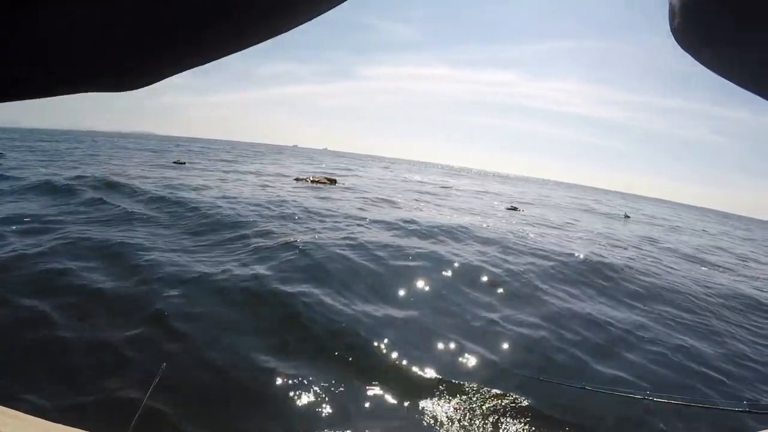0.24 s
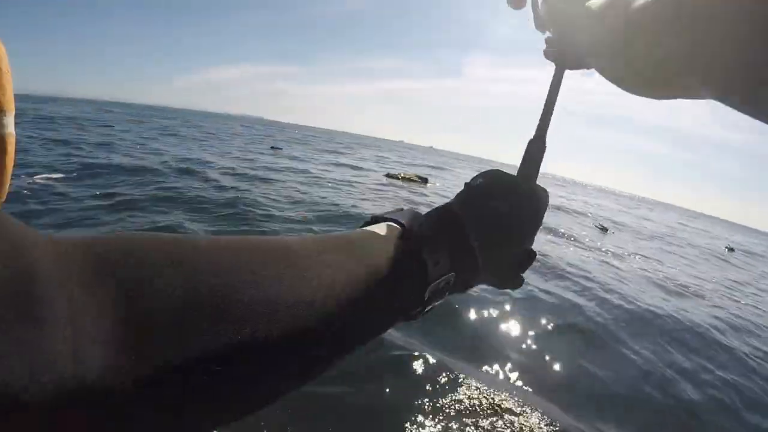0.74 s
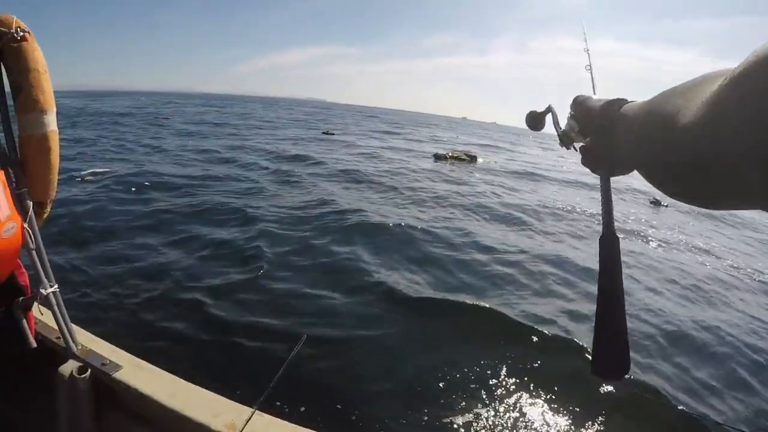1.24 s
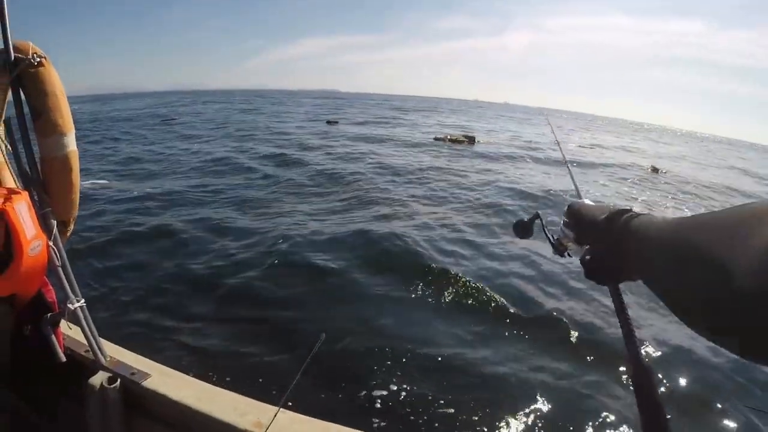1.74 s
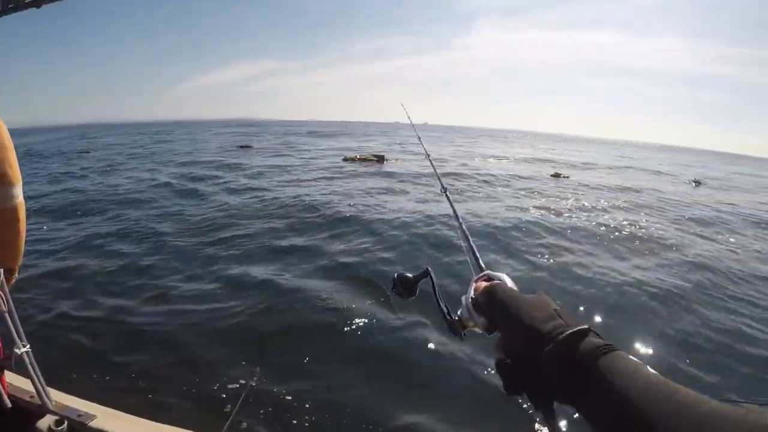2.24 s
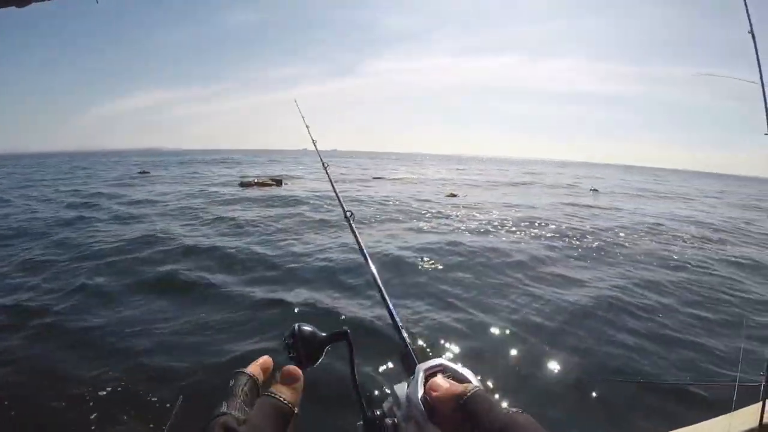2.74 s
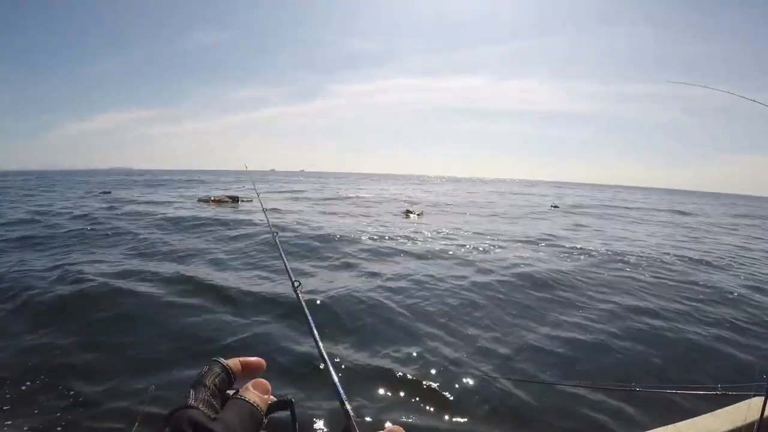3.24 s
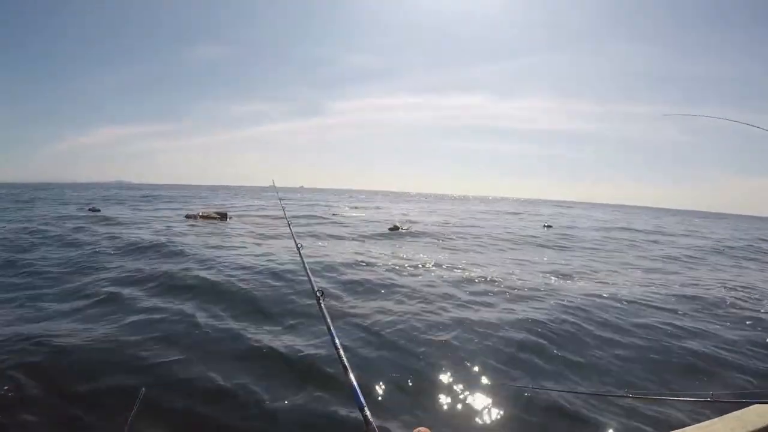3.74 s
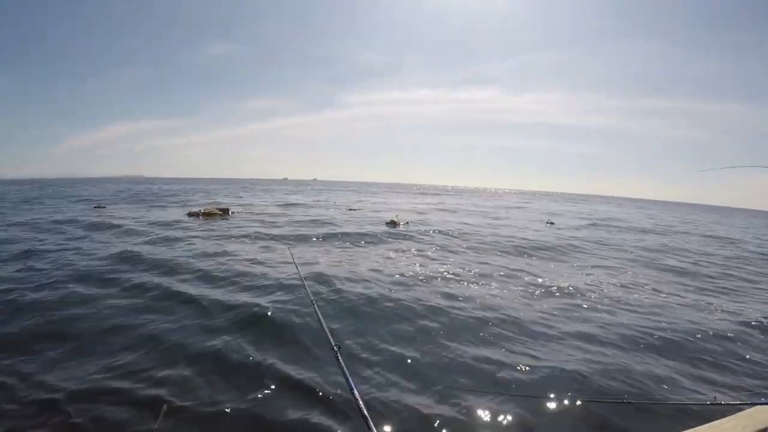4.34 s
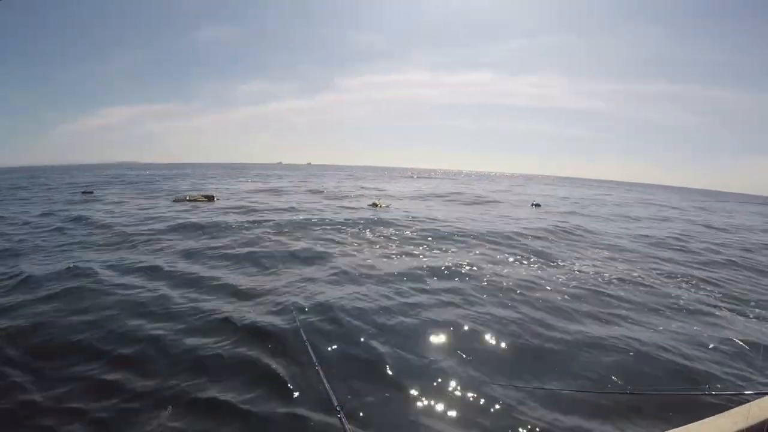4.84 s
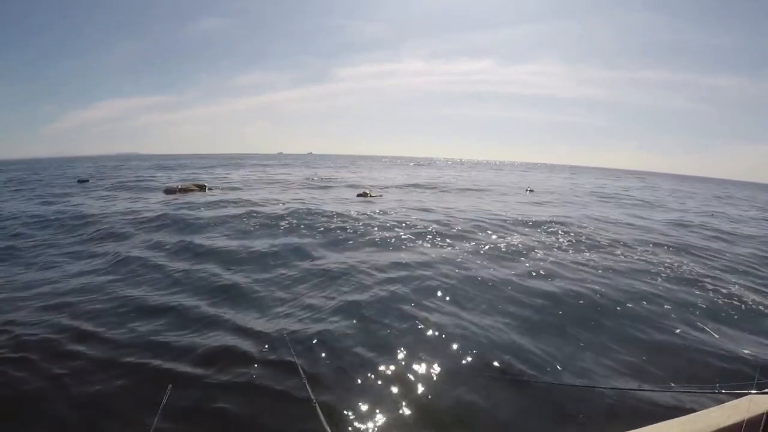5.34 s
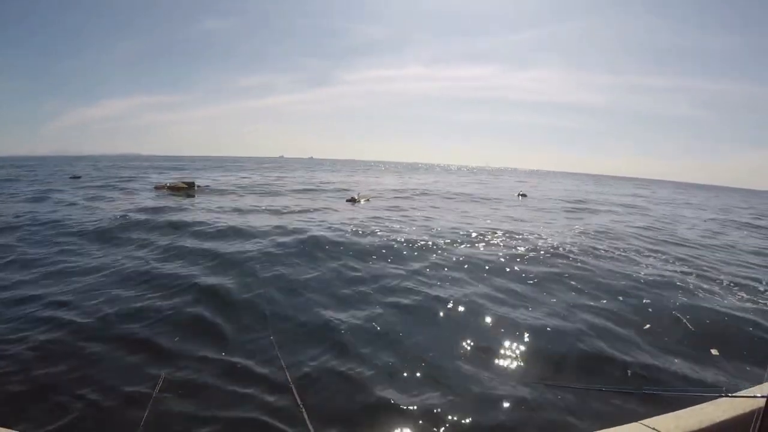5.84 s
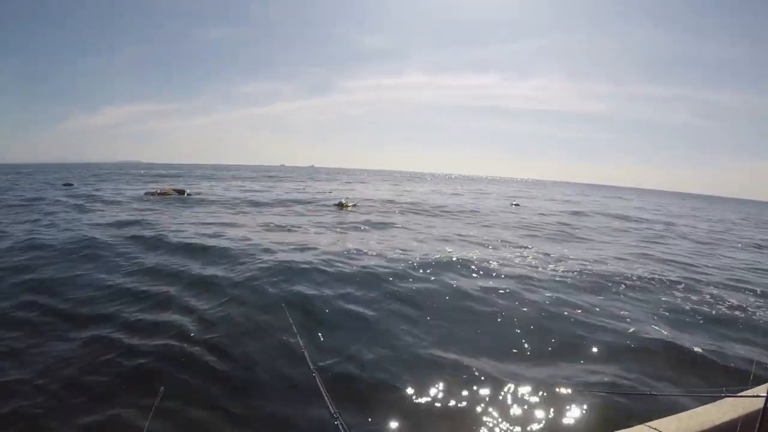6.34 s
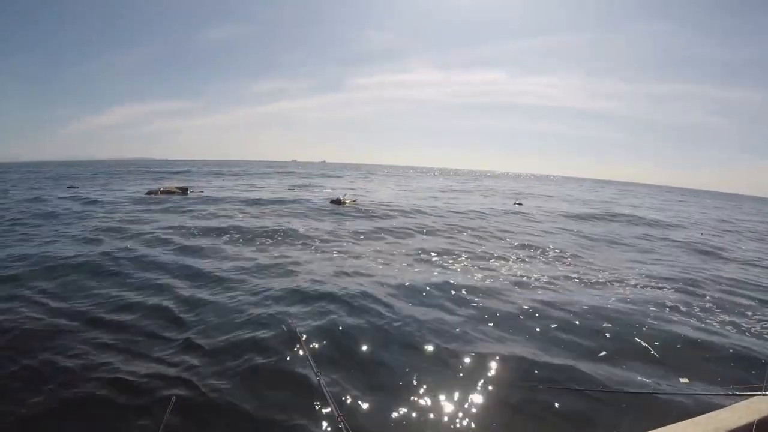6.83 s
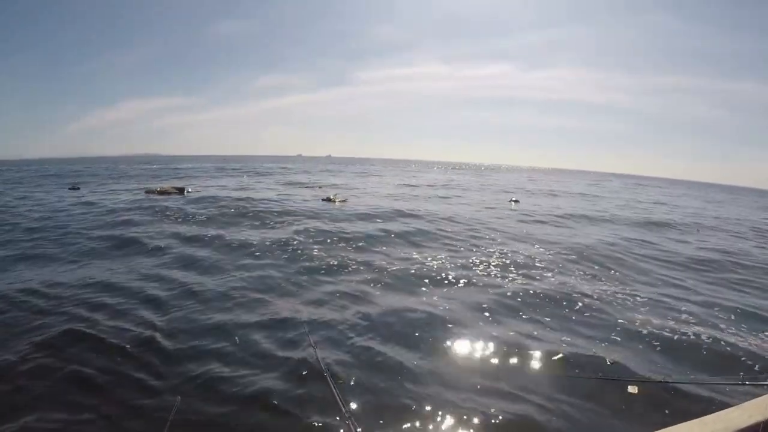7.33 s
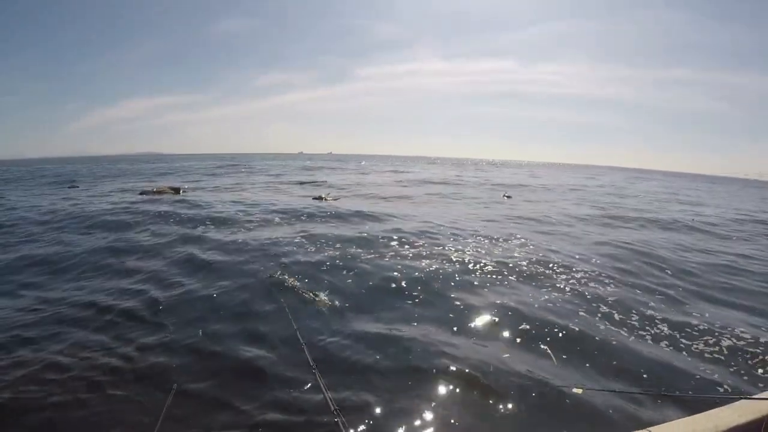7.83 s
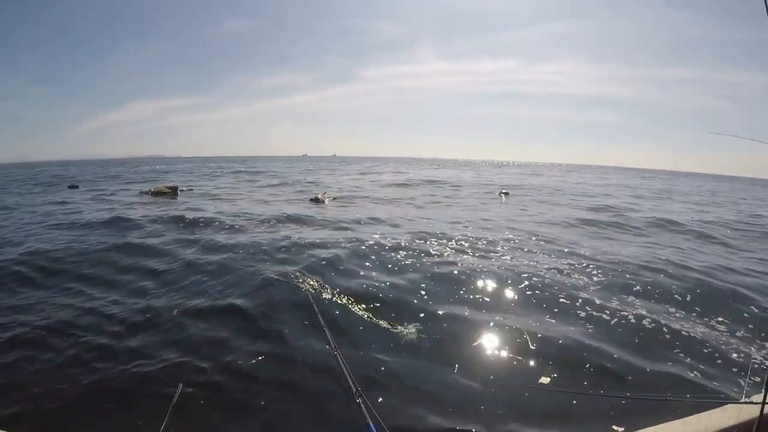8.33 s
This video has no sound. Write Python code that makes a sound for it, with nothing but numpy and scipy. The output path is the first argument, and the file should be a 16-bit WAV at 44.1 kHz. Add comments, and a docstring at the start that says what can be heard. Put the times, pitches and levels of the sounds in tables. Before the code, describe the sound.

Close lapping sea water and hissing foam, hard splashy slaps on a small hull, fishing gear knocking and snapping, then quieter ripples and bubbles.

```python
"""Low lapping and a hiss of foam come first, then hard thumps and slaps of water on the hull of a drifting boat.
Open sea, close at hand, at a small worn camera: filtered noise laps and fizzes, decaying tones thump and bubble.
Sleeves rub and gear knocks through the strap, both grains and blows; the reel snaps; wind noise rumbles low.
Two microphone ports give a sum (mid) and a difference (side) that depend on the path of each sound."""
import sys
import numpy as np
from scipy import signal
from scipy.fft import irfft
from scipy.io import wavfile
from scipy.ndimage import uniform_filter1d

SR = 44100
rng = np.random.default_rng(int(sys.argv[2]) if len(sys.argv) > 2 else 0)


def master(y):
    """Save y as 16-bit WAV."""
    cut = np.clip(np.atleast_2d(y).T, -1, 1)
    pcm = np.round(cut * 32767)  # scale
    wavfile.write(sys.argv[1], SR, pcm.astype(np.int16))


N = 378378


def gain_of(db):
    """Amplitude factor of a level in dB."""
    return 10 ** (np.asarray(db) / 20)


def evened(x):
    """The signal scaled to an RMS of one."""
    return x / np.sqrt(np.mean(x ** 2) + 1e-20)


def curve(table, column):
    """One column of a table as a gain for every sample."""
    rows = np.array(table)
    return gain_of(np.interp(np.arange(N) / SR, rows[:, 0], rows[:, column]))


def band(x, lo_hz, hi_hz):
    """The part of a signal between two frequencies, with gentle slopes."""
    sections = signal.butter(N=2, Wn=[lo_hz, hi_hz], btype="band", fs=SR, output="sos")
    return signal.sosfilt(sections, x)


def flicker(width_s, depth_db):
    """Random level changes that last about width_s."""
    size = max(int(width_s * SR), 1)
    smooth = uniform_filter1d(uniform_filter1d(rng.standard_normal(N), size), size)
    return gain_of(depth_db * evened(smooth))


def grains(spread_db, per_s):
    """Two trains of tiny impacts, a few large: the same moments, but unrelated signs and strengths."""
    hits = rng.random(N) < per_s / SR
    size = gain_of(spread_db * np.minimum(rng.exponential(1, N), 4)) * hits
    return evened(size * rng.standard_normal((2, N)))


def drips(spread_db, per_s):
    """Scattered 9 ms droplets that rise in pitch; per_s at each of ten pitches, alike in both rows."""
    out, u = np.zeros((2, N)), np.linspace(0, 1, 400)
    for hz in np.geomspace(500, 4200, num=10):
        hits = rng.random(N) < per_s / SR
        size = gain_of(spread_db * np.minimum(rng.exponential(1, N), 3)) * hits
        cycles = hz * len(u) / SR * (u + 0.11 * u ** 2)
        drop = np.sin(2 * np.pi * cycles) * np.sin(np.pi * np.sqrt(u))
        out += signal.oaconvolve(size, drop)[:N]
    return evened(out)


def humps(start, length, db, ease_s):
    """Envelope of sounds that ease in, hold and ease out; their powers add."""
    t = np.arange(0, N / SR, .002)
    power = np.zeros(len(t))
    for s, n, level_db in zip(start, length, db):
        ease = np.clip(np.minimum(t - s, s + n - t) / ease_s + .5, 0, 1)
        power += gain_of(2 * level_db) * ease ** 2
    return np.interp(np.arange(N) / SR, t, np.sqrt(power))


def decays(s, db, t60, rise_s):
    """Envelope of many events, each a quick rise and an exponential fall, 6.8 ms longer than t60."""
    out, t = np.zeros(N + SR), np.arange(SR // 3) / SR
    for start, level_db, fall in zip(s, db, np.abs(t60) + 0.0068):
        at = round(start * SR)
        out[at:at + len(t)] += gain_of(level_db - 60 * t / fall) * (1 - np.exp(-t / rise_s))
    return out[:N]


def ports(drive, colour, path, skirt_db=30, focus=0.93):
    """Colours drive[0] causally as the mid; the side mixes it with the unrelated drive[1].

    skirt_db is the fall per octave outside the colour table; focus scales the likeness."""
    octave = np.log2(np.abs(np.fft.fftfreq(4096, 1 / SR)) + 1)
    f, *levels = np.transpose(colour)
    outside = skirt_db * np.abs(octave - np.clip(octave, np.log2(f[0]), np.log2(f[-1])))
    mid, side = (gain_of(np.maximum(np.interp(octave, np.log2(f), db) - outside, -100)) for db in levels)
    f, *relation = np.transpose(path)
    lead, like = (np.interp(octave, np.log2(f), column) for column in relation)
    like = np.clip(focus * like, 0, 1)
    # minimum phase of the mid, shared by all three filters
    turn = np.exp(-1j * signal.hilbert(np.log(mid)).imag)
    spectra = np.array([mid, side * like * np.exp(1j * lead), side * np.sqrt(1 - like ** 2)]) * turn
    # 256 samples of room let the side lead the mid
    taps = np.roll(irfft(spectra[:, :2049]), 256, axis=1)
    taps /= np.linalg.norm(taps[0])
    mid, alike, apart = signal.oaconvolve(drive[[0, 0, 1]], taps, axes=1)[:, 256:256 + N]
    return np.array([mid + alike + apart, mid - alike - apart])


# Slow state of the sea around the boat, before the colour of the ports.
# Each row: time in seconds, lapping in dB, wash in dB.
SEA_STATE = [(0, -45, -45.5), (.3, -48.5, -51.5), (.55, -37, -41.5), (.85, -44.5, -49.5),
             (1.6, -48.5, -47.5), (2.4, -48, -48), (2.65, -43.5, -48.5), (3.35, -42.5, -49.5),
             (3.6, -46.5, -47.5), (4.45, -48, -48), (4.7, -42, -46.5), (5.0, -50, -50.5),
             (5.4, -43.5, -47.5), (5.95, -48, -50.5), (6.28, -41, -48.5), (6.7, -50, -53), (7.5, -47, -51),
             (8.58, -48, -49)]
# Surges of spray along the hull, before filters and colour.
# Each row: start in seconds, length in seconds, wash in dB, fizz in dB.
SPRAY_SURGES = [(0.01, 0.18, -39, -43), (0.156, 0.14, -38, -36.5), (0.292, 0.32, -32, -41),
                (0.686, .13, -36, -55), (1.822, 0.37, -43.5, -46.5), (2.44, 0.13, -32, -43.5),
                (3.313, 0.21, -39.5, -45.5), (3.94, 0.51, -56, -41.5), (4.53, .08, -41, -52),
                (5.24, 0.05, -46, -41), (8.101, 0.099, -52, -41)]
# Colour of the sea at the microphone ports.
# Each row: frequency in Hz, relative mid level in dB, relative side level in dB.
SEA_COLOUR = [(112, -18.5, -25), (147.5, 5.5, 0.5), (268, -2, -4.5), (352, -1, -9.5), (588, -13, -8),
              (1010, -11, -2), (1806, -8, -6.5), (2250, -18, -16), (3300, -13.5, -19), (4420, -25, -26.5),
              (6960, -25.5, -25), (7300, -24, -24.5), (9630, -28, -28.5), (11500, -36, -36),
              (15400, -43, -43)]
# How the side follows the mid for sound through the air, before focus scales the likeness.
# Each row: frequency in Hz, lead of the side in radians, likeness from 0 to 1.
AIR_PATH = [(150, -3.1, .4), (400, -2.7, .7), (900, -2.9, .8), (1250, -3.5, .6), (1700, -4.7, .8),
            (2400, -7.9, .6), (3500, -9.3, .6), (4600, -9.4, .2), (7500, -9.5, .9), (14000, -9.5, .6)]


def sea():
    """Lumpy low lapping, a wash with droplets, spluttering surges and fizzing foam come by air."""
    surge_ease_s, fizz_over_wash_db = 0.11, 5.5
    noise = rng.standard_normal((3, 2, N))
    lapping = curve(SEA_STATE, column=1) * flicker(.03, 2.6) * band(noise[0], 99, 595)

    s, length, wash_db, fizz_db = np.transpose(SPRAY_SURGES)
    calm = curve(SEA_STATE, column=2)
    surge = humps(s, length, wash_db, surge_ease_s)
    puffs = flicker(.04, 1.6) * band(noise[1], 580, 4250)
    wash = np.hypot(calm, gain_of(-4.0) * surge) * puffs
    wash += 0.093 * calm * drips(8.8, 4)
    trickle = gain_of(-20) * drips(6.8, 40)
    splutter = gain_of(-4) * flicker(0.031, 7.1) * band(grains(2.6, 2500), 4150, 6800)
    wash += surge * (trickle + splutter)

    foam = noise[2] + 0.63 * grains(3.9, 2500)
    bursting = np.hypot(gain_of(fizz_over_wash_db) * calm, humps(s, length, fizz_db, surge_ease_s))
    fizz = bursting * flicker(0.021, 1.7) * band(foam, 4570, 12700)
    return ports(lapping + wash + fizz, SEA_COLOUR, AIR_PATH, skirt_db=41.0, focus=0.71)


# Low thumps of the hull under the camera.
# Each row: start in seconds, level before rise and filters in dB, settled pitch in Hz, left over right in dB.
HULL_THUMPS = [(0.226, -18.5, 189, 3), (0.365, 1.9, 203, -1.1), (0.492, -15, 200, 2),
               (0.592, -15.5, 230, 12), (0.622, -24, 200, 0), (0.656, -10, 306, 8), (0.836, -23, 250, 3),
               (1.657, -17.5, 313, 27), (1.692, -34, 270, 42), (1.861, -21, 170, 19), (2.767, -19, 250, 6),
               (2.851, -16.5, 204, 17), (3.082, -17, 159, -5), (3.478, -22.5, 340, 23),
               (3.694, -20, 171, -16), (3.728, -20.5, 220, 0), (4.736, -3, 166, -1), (4.781, -11, 178, 1),
               (5.406, -16, 330, -3), (5.526, -8.5, 201, -1.5), (5.615, -24, 175, -18),
               (5.707, -23, 266, 0), (5.863, -23, 160, 0), (6.119, -14.5, 151, 9), (6.185, -21, 199, -1.1),
               (6.278, -16.5, 150, 0), (6.463, -18.5, 330, 6), (7.283, -24, 175, 1), (7.8995, -11, 320, 17)]


def thumps():
    """The hull swings for a few cycles, its pitch sagging at the onset, and rumbles on."""
    swing_t60_s, rumble_db, rumble_t60_s = 0.023, -18.5, 0.23
    out, t = np.zeros((2, N + SR)), np.arange(SR // 8) / SR
    for s, db, hz, pan_db in HULL_THUMPS:
        swing = np.sin(2 * np.pi * hz * (t + 0.00078 * (1 - np.exp(-t / 0.0014))))
        shape = gain_of(db - 60 * t / swing_t60_s) * (1 - np.exp(-t / 0.0015)) ** 2
        pan = gain_of([[pan_db / 2], [-pan_db / 2]])
        out[:, round(s * SR):][:, :len(t)] += pan * shape * swing
    s, db, _, _ = np.transpose(HULL_THUMPS)
    rumble = evened(band(rng.standard_normal(N), 135.3, 187))
    tail = decays(s, db + rumble_db, rumble_t60_s + 0 * s, 0.0014) * rumble
    # the thumps have little below about 120 Hz
    return band(band(out[:, :N] + tail, 122, 2000), 120, 2200)


# Slaps of water close to the camera; brightness trades body for sizzle.
# Each row: start in seconds, level before filters in dB, brightness in dB, ring in Hz, nominal t60 in seconds.
WATER_SLAPS = [(0.06, -30.5, -0.5, 3250, 0.2), (0.215, -34, 3, 3640, 0.12), (0.365, -7.5, -5, 1350, 0.036),
               (0.6998, -32, 1.5, 1540, 0.065), (1.512, -35, -1, 2000, 0.04), (2.01, -29, -5, 2880, 0.05),
               (2.113, -38.5, 6, 3920, 0.046), (2.157, -34, -2, 3400, 0.079),
               (2.3509, -11, -0.5, 1790, 0.13), (2.593, -21, 0.5, 1560, 0.16), (2.626, -34, -6, 1510, 0.12),
               (2.645, -28.5, 0, 1650, 0.077), (3.0782, -32, 9, 1640, 0.078), (3.871, -27.5, 0, 3060, 0.11),
               (3.877, -23, -3, 1250, 0.043), (3.884, -27, -5.5, 990, 0.056),
               (4.7346, -10.5, -11, 1490, 0.092), (4.7836, -14, -11, 1510, 0.085),
               (5.046, -44, 17, 1670, 0.11), (5.292, -27, -3, 1650, 0.08), (5.3787, -30.5, 5, 1630, 0.12),
               (5.401, -21, -1.5, 3360, 0.1), (5.4584, -39, 8.5, 1720, 0.085), (5.525, -8, -2, 1740, 0.084),
               (5.554, -17.5, 2, 1580, 0.13), (5.706, -20, -0.8, 3700, 0.083),
               (5.7867, -37, 0, 1200, 0.041), (5.862, -35, -7, 1670, 0.075), (5.876, -33, 0, 3300, 0.083),
               (5.896, -26, -3.5, 2970, 0.14), (6.072, -40, 3, 3540, 0.095), (6.099, -31, -5, 3500, 0.076),
               (6.116, -33, -10, 2200, 0.05), (6.173, -14, -1, 2400, 0.077), (6.2696, -37, 3.5, 1760, 0.15),
               (6.366, -47.5, 15, 3500, 0.1), (6.4389, -28.5, -7, 3570, 0.088),
               (7.0355, -39.5, 0, 3660, 0.084), (7.148, -36.5, -6, 3550, 0.06), (7.9, -31, -7, 1500, 0.04),
               (7.929, -44, -5, 1800, 0.053), (8.516, -38, -5, 1520, 0.1), (8.527, -36, -4, 1990, 0.055)]
# Colour of a splash at the microphone ports.
# Each row: frequency in Hz, relative mid level in dB, relative side level in dB.
SPLASH_COLOUR = [(149, 17, -18), (265, -0.5, -20), (402, 8.5, -7), (640, -7, -1.5), (1060, -0.5, 3),
                 (1280, -3, 2), (1650, -5, -6), (2260, -14.5, -10), (2800, -13, -15.5), (3480, -12, -22),
                 (3990, -17.5, -25), (6800, -25, -23), (7750, -24.5, -24), (9570, -31, -31),
                 (14000, -49, -45)]


def slaps():
    """A crack, then a burst of droplets; air pockets ring, purer in quiet slaps, and the body lingers."""
    body_db, sizzle_db = -8, 6.5  # against the slap, at zero brightness
    s, db, bright_db, ring_hz, t60 = np.transpose(WATER_SLAPS)
    spray = grains(0.1, 6000)
    crack = decays(s, db - 19.0, 0.084 * t60, 0.00049)
    smack = (decays(s, db, t60, 0.00031) + crack) * spray
    body = decays(s, db + body_db - bright_db, 1.23 * t60, .0022) * band(spray, 476, 2400)
    sizzle = decays(s, db + sizzle_db + bright_db, 0.83 * t60, 0.00063) * band(spray, 3220, 10400)
    rung, starts = np.zeros((2, N)), np.round(s * SR).astype(int)
    # each ring lasts at most until the next slap
    for at, end, hz, level_db in zip(starts, [*starts[1:], N], ring_hz, db):
        purity = gain_of(-2.5 - .22 * level_db)
        rung[:, at:end] = purity * band(smack[:, at:end], hz / 1.01, hz * 1.12)
    return ports(body + band(smack, 1660, 4760) + rung + sizzle, SPLASH_COLOUR, AIR_PATH, focus=0.84)


# Dull knocks of gear, reaching the housing through its strap.
# Each row: time in seconds (the blow falls 3 ms later), level before filters in dB.
GEAR_KNOCKS = [(0.593, -9), (0.621, -5.5), (0.657, 0.5), (0.836, -14.5), (1.658, -10.5), (1.692, -17),
               (1.863, -16.5), (2.754, -9.5), (2.764, -11.5), (2.812, -12.5), (2.85, -16), (2.93, -4.5),
               (3.025, -5), (3.078, -2.5), (3.199, -2), (3.267, -9), (3.35, -7), (3.479, -16.5),
               (3.506, -7), (3.571, -13), (3.691, -3.5), (4.059, -14), (4.292, -15.5), (4.423, -16.5),
               (4.574, -16.5), (4.646, -6), (5.614, -15), (6.115, -13.5), (6.379, -9.5), (6.467, -17.5),
               (7.8979, -8)]
# Colour of the strap at the microphone ports.
# Each row: frequency in Hz, relative mid level in dB, relative side level in dB.
STRAP_COLOUR = [(221, 4.5, 2.5), (394, 3, 13), (463, 11, 17.5), (570, 2.5, 10.5), (880, -9.5, 13),
                (1020, 6.5, 15), (1172, 6.5, 15), (1450, -14, 1), (1510, -5, 8), (2100, -14, -5.5),
                (2300, -1, 8), (2690, -12, -8), (3200, -21, -50), (3940, -20, -47)]
# How the side follows the mid for sound through the strap, before focus scales the likeness.
# Each row: frequency in Hz, lead of the side in radians, likeness from 0 to 1.
STRAP_PATH = [(250, .6, .5), (470, 0, .9), (800, -.4, .8), (1000, -1.9, .7), (1170, -1.6, .8),
              (1400, -1, .5), (2400, -1.6, .8), (3400, -2.8, .5)]


def knocks():
    """A soft blow, a quick rebound and a brief scuff ring the housing; the blow pushes both ports alike."""
    s, db = np.transpose(GEAR_KNOCKS)
    blows = np.zeros(N)
    blows[np.round((s + .003) * SR).astype(int)] = gain_of(db)
    blows += 0.43 * np.roll(blows, round(0.00147 * SR))  # rebound
    scuff = decays(s + 0.0018, db - 19, 0.016 + 0 * s, 0.001) * rng.standard_normal((2, N))
    push = gain_of(5) * band(band(blows, 140, 1100), 140, 2600)
    ringing = band(band(blows + scuff, 172, 1450), 143, 6500)
    return push + ports(ringing, STRAP_COLOUR, STRAP_PATH, skirt_db=2.0, focus=1.35)


# Deep boom of the hull after a knock.
# Each row: start in seconds, level before the rise in dB, pitch in Hz, t60 in seconds.
HULL_BOOMS = [(0.672, -17, 21, 0.33)]


def booms():
    """A slow, deep swing of the hull that dies within a few cycles, the same at both ports."""
    out, t = np.zeros(N), np.arange(SR // 2) / SR
    for s, db, hz, t60 in HULL_BOOMS:
        shape = gain_of(db - 60 * t / t60) * (1 - np.exp(-t / 0.0086))
        out[round(s * SR):][:len(t)] += shape * np.sin(2 * np.pi * hz * t)
    return out


# Strokes of the angler's sleeves on the strap, before flicker and colour.
# Each row: start in seconds, length in seconds, level in dB.
SLEEVE_STROKES = [(0.172, 0.65, -42), (0.786, 1.33, -50), (1.936, 1.01, -48), (2.327, 0.1, -39),
                  (3.257, 0.22, -36), (3.5, 0.66, -58), (7.866, 0.19, -52)]


def sleeves():
    """Cloth dragging over the strap: dense grains in uneven strokes."""
    stroke_ease_s, resting_db = 0.21, -59.5
    pressure = np.hypot(gain_of(resting_db), humps(*np.transpose(SLEEVE_STROKES), stroke_ease_s))
    rub = pressure * flicker(0.024, 2.34) * grains(2.4, 4000)
    return ports(rub, STRAP_COLOUR, STRAP_PATH, skirt_db=19.0)


# Snaps and ticks of the reel, heard through the air.
# Each row: time in seconds (the click falls 0.6 ms later), click in dB and rasp in dB before the colour,
# nominal rasp t60 in seconds.
REEL_SNAPS = [(0.266, -17, -39, .004), (0.52, -30, -31, 0.046), (0.532, -16, -21.5, 0.05),
              (0.542, -20, -40, 0.0085), (1.9295, -13.5, -30.5, 0.0041), (0.538, -1, -12, 0.008),
              (3.3946, -2, -17, 0.0092), (2.748, -28, -40, 0.0037), (3.391, -22, -17.5, 0.012),
              (3.398, -13, -46, 0.0083), (3.545, -33, -40, .004)]
# Colour of the reel at the microphone ports.
# Each row: frequency in Hz, relative mid level in dB, relative side level in dB.
REEL_COLOUR = [(1000, -13, -8), (1550, -1.5, -4), (2010, -3, -3), (2640, -1, -4), (3580, 0.5, -10),
               (4530, -11, -9), (5420, -3.5, -12), (6500, -23.5, -9), (7070, -6.5, -8), (8500, -13.5, -13),
               (12700, -28.5, -29), (15000, -39, -36)]


def reel():
    """Hard little snaps of the mechanism: a click, a short rasp and a faint rattle behind."""
    s, click_db, rasp_db, t60 = np.transpose(REEL_SNAPS)
    clicks = np.zeros(N)
    clicks[np.round((s + .0006) * SR).astype(int)] = gain_of(click_db)
    rasp = decays(s, rasp_db, t60, .0003)
    rattle = decays(s, rasp_db - 12.5, 0.044 + 0 * s, 0.00048)
    snaps = clicks + (rasp + rattle) * rng.standard_normal((2, N))
    return ports(snaps, REEL_COLOUR, AIR_PATH, skirt_db=12, focus=.9)


# Bubbles in the water by the boat.
# Each row: start in seconds, level before wobble and pan in dB, starting pitch in Hz, rise in octaves,
# length in seconds.
AIR_BUBBLES = [(7.931, -34, 650, -0.86, 0.029), (7.965, -32, 380, 0, 0.01), (7.948, -48, 1600, .1, 0.011),
               (8.06, -39.5, 320, 0.64, 0.016), (8.009, -32, 1120, 0.15, 0.0079),
               (8.088, -37.5, 1670, 0.045, .011), (8.446, -41, 1250, .7, .024), (8.2, -42, 1230, .1, 0.013),
               (7.931, -41, 1900, .1, .006)]


def bubbles():
    """Short gliding tones of trapped air, roughened by the churning water, each with a small spatter."""
    out = np.zeros(N)
    for s, db, hz, rise, length in AIR_BUBBLES:
        u = np.linspace(0, 1, round(length * SR))
        tone = np.sin(2 * np.pi * np.cumsum(hz * 2 ** (rise * u)) / SR)
        out[round(s * SR):][:len(u)] += gain_of(db) * np.sin(np.pi * u ** 0.58) * tone
    wobble = evened(flicker(.001, 3.5))
    s, db = np.transpose(AIR_BUBBLES)[:2]
    spatter = decays(s, db - 8, 0.049 + 0 * s, .003) * band(grains(2, 3300), 500, 2300)
    pan = gain_of([[-1.5], [1.5]])
    return wobble * out * pan + spatter[0] + .4 * spatter


# Wind at the microphone ports, the rumble before its flicker.
# Each row: time in seconds, deep buffeting in dB, rumble in dB.
WIND_LEVELS = [(0, -74, -80), (0.32, -64, -73), (0.42, -52, -51), (0.7, -40, -42), (0.86, -45, -48),
               (1.05, -34, -48), (1.45, -41, -49), (1.7, -55, -52), (2.5, -61, -62), (3.5, -68, -69),
               (3.6, -74, -79), (4.66, -80, -78), (4.8, -63, -54), (5.35, -48, -53), (5.95, -50, -55),
               (6.15, -55, -48), (6.55, -57, -65), (7.1, -62, -74), (8.58, -72, -82)]


def wind():
    """Slow pressure lumps, nearly the same at both ports."""
    noise = rng.standard_normal((2, 2, N))
    deep = curve(WIND_LEVELS, column=1) * evened(band(band(noise[0], 12.4, 40), 12.4, 40))
    rumble = curve(WIND_LEVELS, column=2) * flicker(0.053, 7.0) * evened(band(noise[1], 48.0, 97.0))
    low = deep + rumble
    return low[0] + gain_of(-15) * low[1] * [[1], [-1]]


def scene():
    """Everything that reaches the two ports."""
    water_and_hull = sea() + thumps() + slaps() + booms() + bubbles()
    return water_and_hull + knocks() + sleeves() + reel() + wind()


def record(dry):
    """The band limit of the recorder: a steep low-pass."""
    edge_hz = 16200
    lowpass = signal.firwin(511, edge_hz, window=("kaiser", 9), fs=SR)
    return signal.oaconvolve(dry, lowpass[None], "same")


dry = scene()
out = record(dry)
master(out)
```